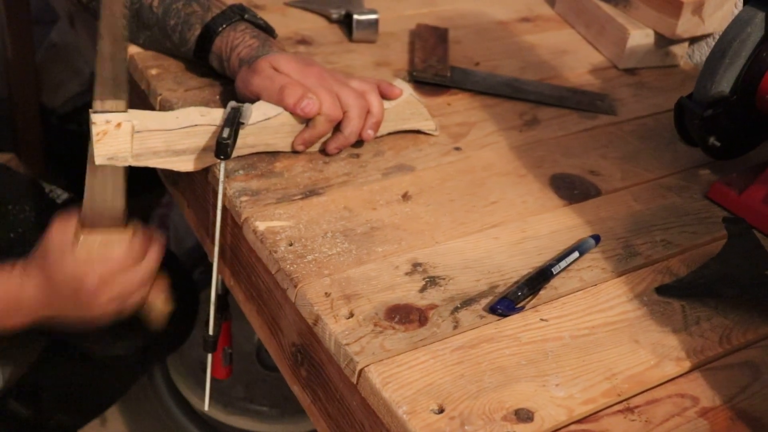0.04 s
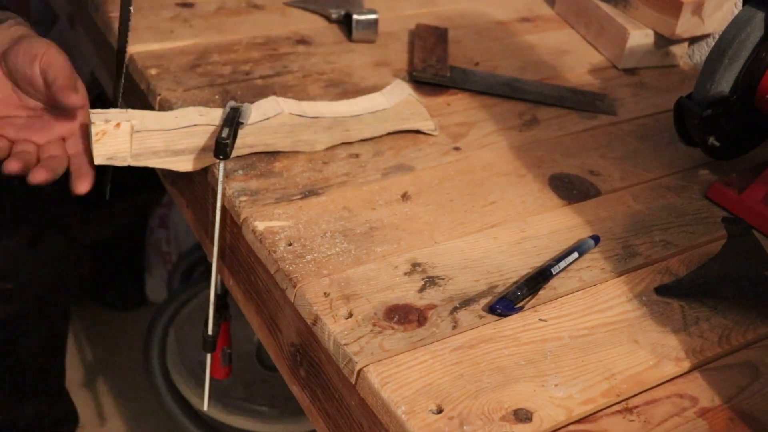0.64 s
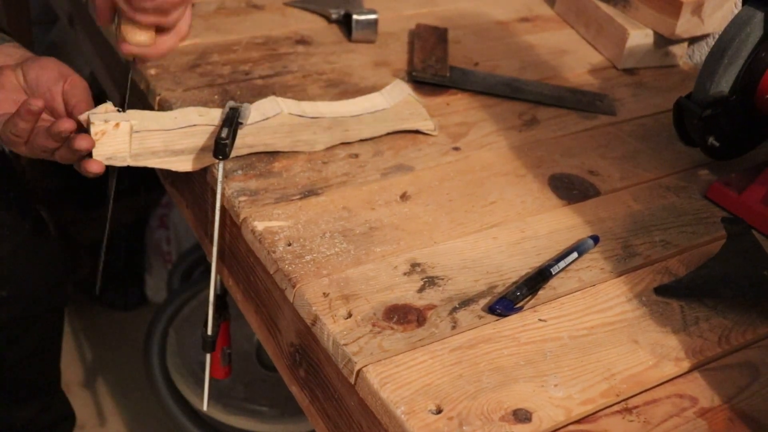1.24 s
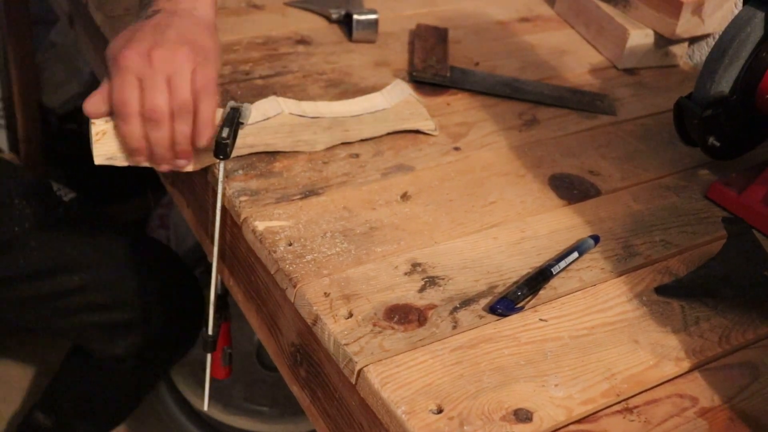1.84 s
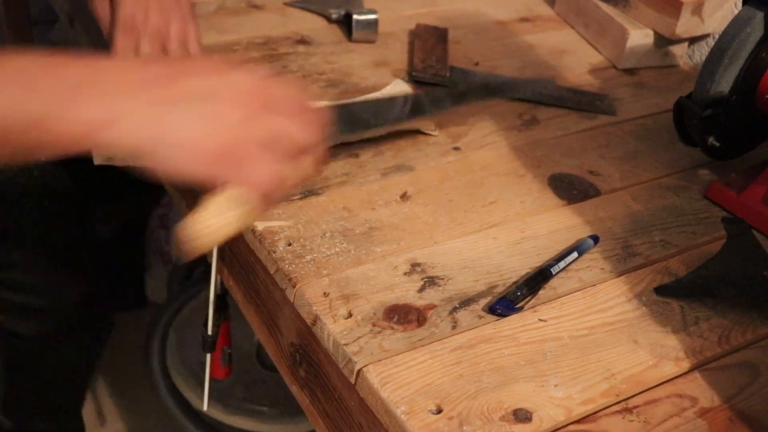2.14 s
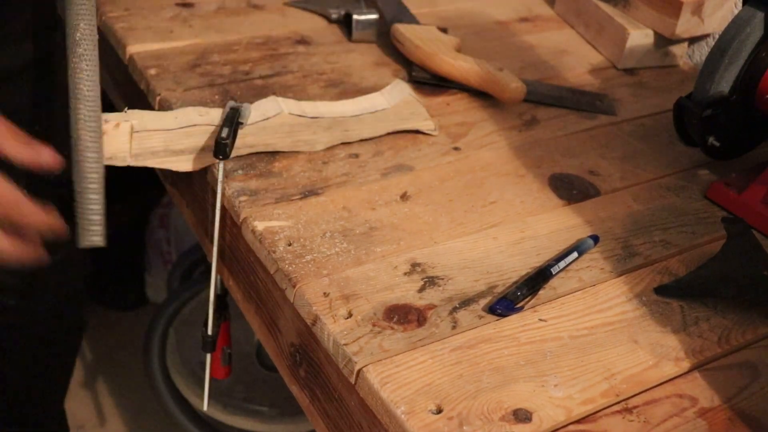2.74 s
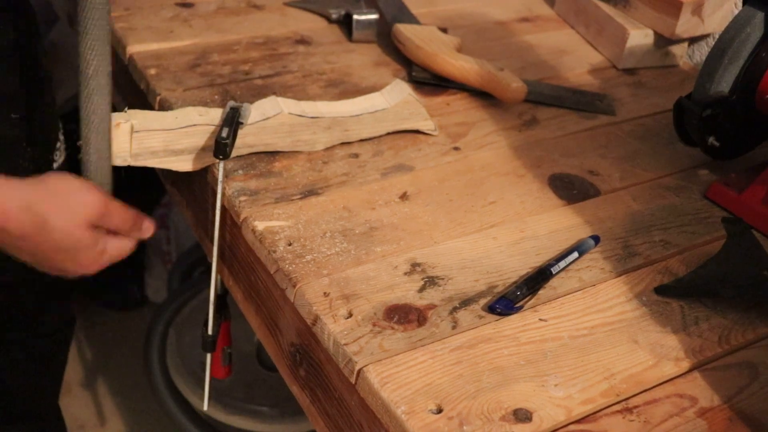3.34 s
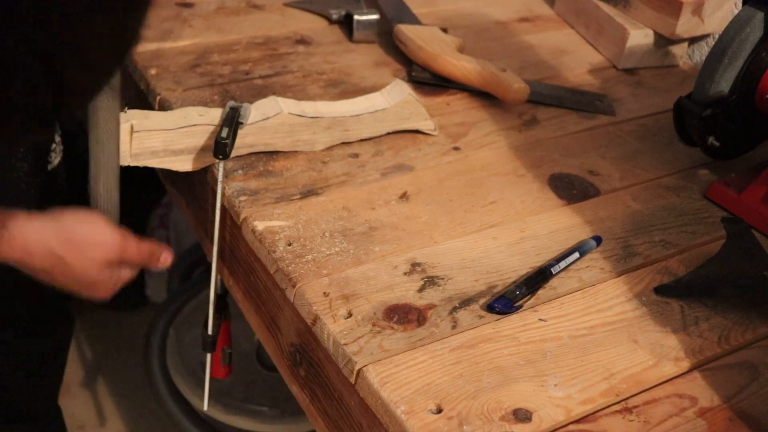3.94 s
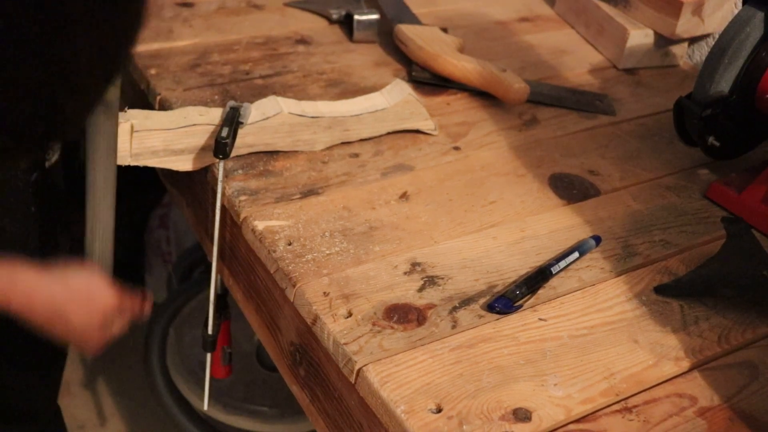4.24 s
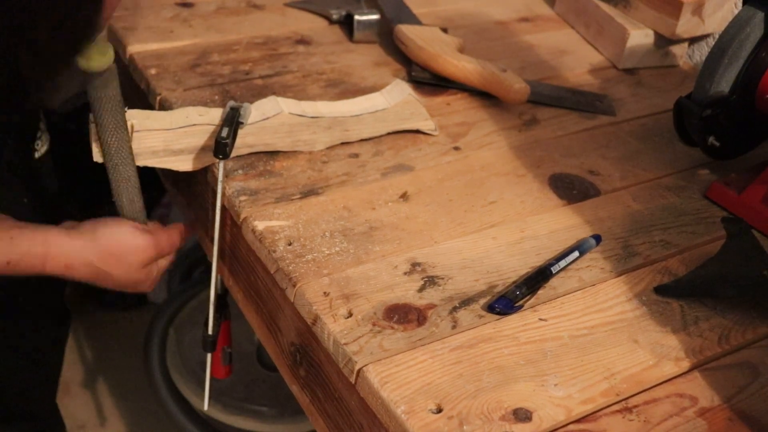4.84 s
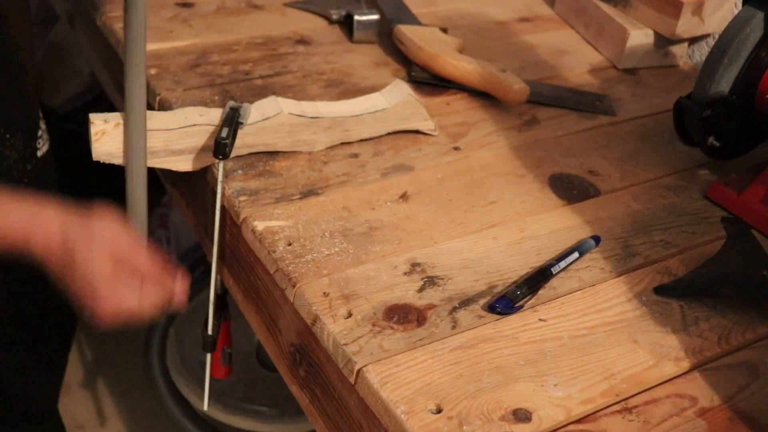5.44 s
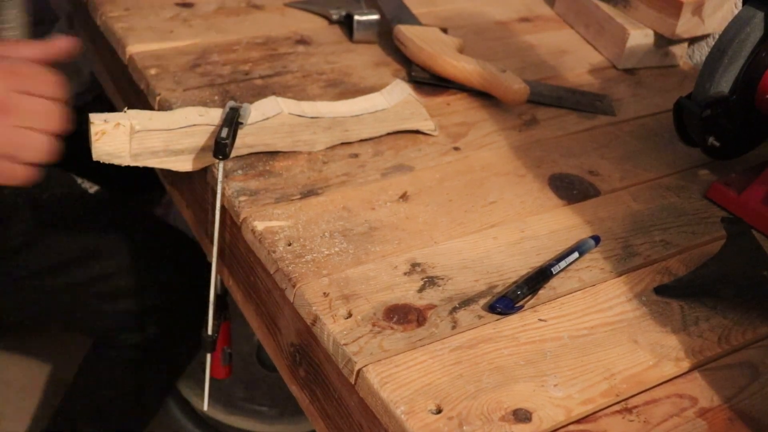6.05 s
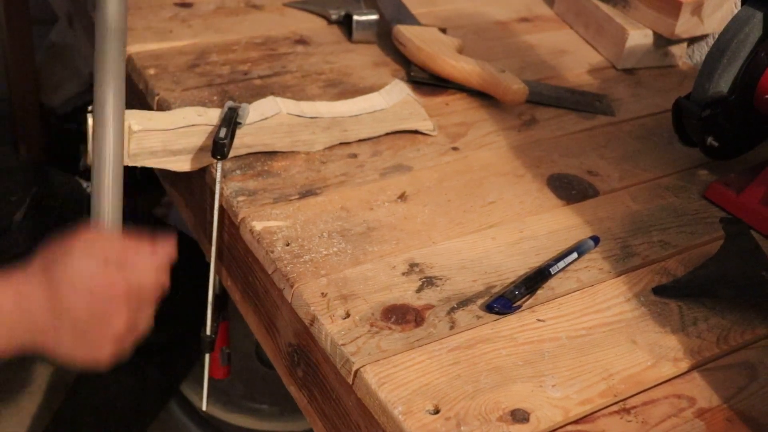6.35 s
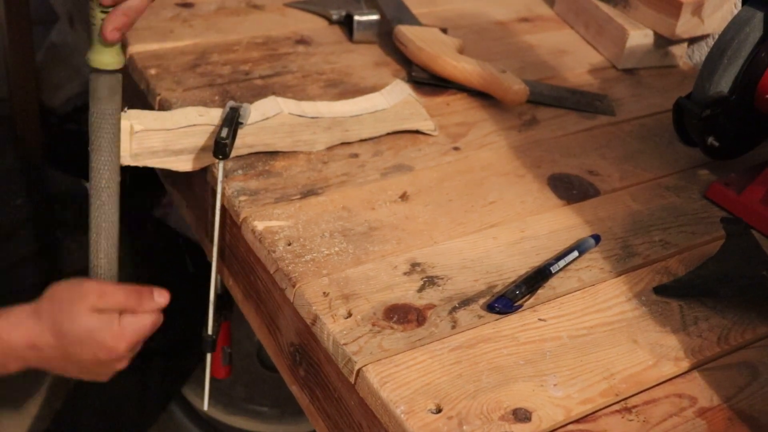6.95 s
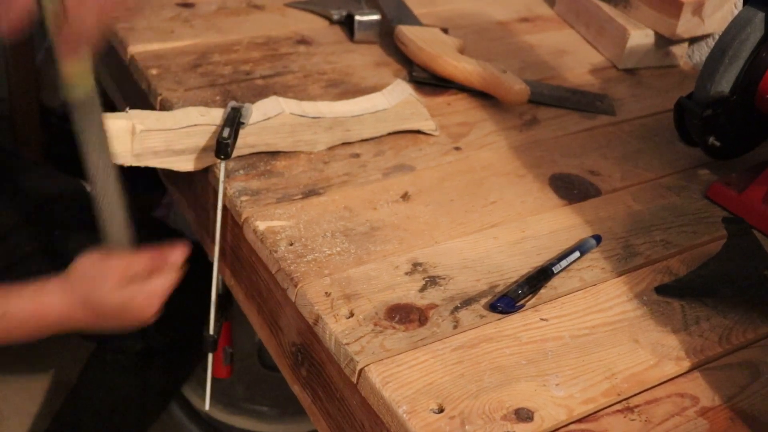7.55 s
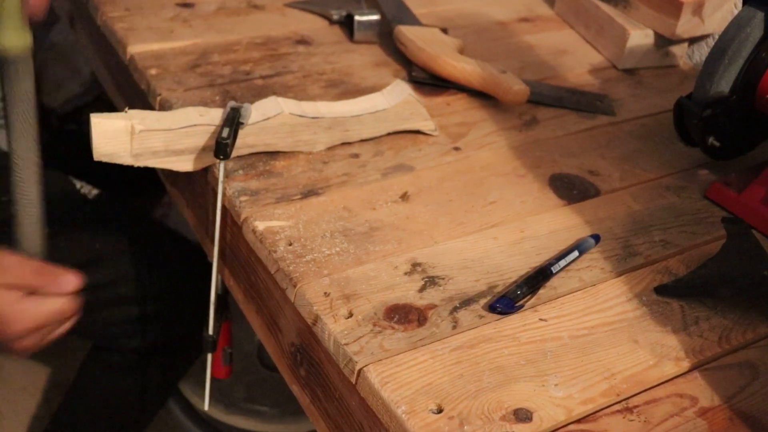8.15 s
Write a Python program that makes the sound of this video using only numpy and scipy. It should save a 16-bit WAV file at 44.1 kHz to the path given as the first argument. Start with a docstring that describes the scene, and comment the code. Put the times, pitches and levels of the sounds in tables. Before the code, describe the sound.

Fast, coarse filing of a wooden handle in a quiet workshop, broken by tool clacks and a short seat scrape.

```python
"""A quick, gritty back-and-forth scraping: a rasp and a file work a wooden handle clamped to a bench.
The teeth tear fibres, giving a coarse hiss, a bright fizz on the cuts and a hollow ring in the handle.
Between bouts the tools knock and slide, a seat scrapes and groans, and hands and sleeves brush about.
Underneath lie the workshop's even noise and a faint, sinking hum."""
import sys
import numpy as np
from scipy import signal
from scipy.fft import rfft, irfft
from scipy.io import wavfile
from scipy.ndimage import uniform_filter1d

SR = 44100
rng = np.random.default_rng(int(sys.argv[2]) if len(sys.argv) > 2 else 0)


def generate_wav(sig):
    """Save sig (samples, or channels by samples) to the path in sys.argv[1] as 16-bit PCM at SR."""
    pcm = np.round(np.clip(np.atleast_2d(sig).T, -1, 1) * 32767).astype(np.int16)
    wavfile.write(sys.argv[1], SR, pcm)


N = 361179
TAPS = 4096
HZ = np.fft.rfftfreq(TAPS, 1 / SR)


def amp(db):
    """Decibels to gain."""
    return 10 ** (np.asarray(db) / 20)


def unit_rms(x):
    """Scales to rms 1."""
    return x / np.sqrt(np.mean(x ** 2) + 1e-20)


def eq_curve(points):
    """Joins EQ points on a log-frequency axis, in dB."""
    hz, db = np.transpose(points)
    return np.interp(np.log(HZ + 1), np.log(hz), db)


def add(mix, s, sound):
    """Mixes a sound in at time s."""
    part = mix[max(round(s * SR), 0):][:len(sound)]
    part += sound[:len(part)]


def ring(x, response):
    """Passes x through an impulse response scaled to unit energy."""
    return signal.oaconvolve(x, response / np.linalg.norm(response))[:len(x)]


def colour(x, db):
    """Minimum-phase EQ; only the curve's shape counts, not its overall level."""
    log_gain = np.log(amp(np.r_[db, db[-2:0:-1]]))
    spectrum = np.exp(np.conj(signal.hilbert(log_gain)))
    return ring(x, np.fft.ifft(spectrum).real)


def arch(length, skew):
    """Swell and fade of one movement; a skew under 1 sharpens the attack."""
    return np.sin(np.pi * np.linspace(0, 1, max(int(length * SR), 2)) ** skew)


def waver(hz):
    """Smooth random modulation of rms 1, up to the given rate."""
    rolloff = 1 + (np.fft.rfftfreq(N, 1 / SR) / hz) ** 4
    return unit_rms(irfft(rfft(rng.standard_normal(N)) / rolloff, N))


def grit(per_s, spread_db):
    """Random snaps of fibres, a few standing out in size."""
    size = amp(spread_db * np.minimum(rng.exponential(1, N), 4))
    return unit_rms(size * rng.choice([-1, 1], N) * (rng.random(N) < per_s / SR))


def drift(x, depth_db=3.5):
    """The point of contact travels, so the colour shifts from moment to moment."""
    spectra = signal.stft(x, nperseg=512)[2]
    patches = uniform_filter1d(rng.standard_normal(spectra.shape), size=4, axis=0)
    patches = unit_rms(uniform_filter1d(patches, size=5, axis=1))
    trim_db = depth_db ** 2 * np.log(10) / 20  # holds the mean power
    return signal.istft(spectra * amp(depth_db * patches - trim_db), nperseg=512)[1][:N]


def reflections(x, t60):
    """A short, dense spray of echoes from bench and walls."""
    t = np.arange(TAPS) / SR
    return ring(x, rng.standard_normal(TAPS) * amp(-60 * t / t60) * (t > .0005))


# tone of the empty workshop: (frequency [Hz], gain [dB])
ROOM_EQ = [(25, -28), (55, -4), (90, -1.5), (180, 0), (290, 5.5), (420, 6), (900, 8.5), (2500, 4),
           (6000, 0.5), (16000, 4.5)]
def room_tone(db=-52):
    """A bed of faint, even noise."""
    return amp(db) * colour(rng.standard_normal(N), eq_curve(ROOM_EQ))


# glide of the hum: (time [s], pitch [Hz], level [dB])
HUM_GLIDE = [(1.2, 317, -77), (2.2, 300, -67.5), (2.6, 281, -71), (3.1, 254.6, -82), (6, 192.2, -77),
             (8.1, 170, -87)]
def hum(wobble=0.013):
    """A faint, unsteady hum sinks slowly in the background."""
    s, hz, db = np.transpose(HUM_GLIDE)
    t = np.arange(N) / SR
    pitch = np.interp(t, s, hz) * (1 + wobble * waver(hz=18))
    return amp(np.interp(t, s, db)) * unit_rms(np.sin(2 * np.pi * np.cumsum(pitch) / SR))


def bench_bump(s=1.543, db=-50, swell_s=0.01, low_hz=98, high_hz=160):
    """A soft, low bump against the bench."""
    t = np.maximum(np.arange(N) / SR - s, 0)
    envelope = amp(db) * t / swell_s * np.exp(1 - t / swell_s)
    return envelope * (np.sin(2 * np.pi * low_hz * t) + .5 * np.sin(2 * np.pi * high_hz * t))


# hand and sleeve moves: (start [s], length [s], soft rub [dB], fine hiss [dB])
BRUSH_CUES = [(0.404, 0.18, -60, -45.5), (0.593, 0.095, -49, -41.5), (1.452, 0.24, -51.5, -44),
              (1.564, 0.042, -40.5, -40.5), (1.58, 0.26, -56.5, -51), (1.763, 0.096, -43, -46.5),
              (1.9, 0.042, -39, -49), (1.979, 0.044, -40.5, -45.5), (1.982, 0.31, -49, -50.5),
              (2.564, 0.58, -55, -51), (5.68, 0.19, -61, -51.5), (5.839, 0.11, -47.5, -47.5),
              (5.974, 0.1, -65, -46.5), (6.13, 0.17, -41, -54)]
# tone of the rub and of the sleeve's hiss: (frequency [Hz], gain [dB])
RUB_EQ = [(100, -44), (350, 1), (450, -4.5), (660, 11), (1100, -3.5), (2800, 5), (4500, -1), (6500, 5.5),
          (10000, -15), (16000, -49)]
SLEEVE_EQ = [(500, -34), (4000, -12), (7000, -1.5), (9200, 3.5), (11000, 2), (13000, 0), (14500, 3.5),
             (16000, -9)]
def brushes(skew=0.57, uneven_db=3.5):
    """Skin and cloth slide unevenly over the dusty wood."""
    rub_power, hiss_power = np.zeros((2, N))
    for s, length, rub_db, hiss_db in BRUSH_CUES:
        add(rub_power, s, (amp(rub_db) * arch(length, skew)) ** 2)
        add(hiss_power, s, (amp(hiss_db) * arch(length, skew)) ** 2)
    pressure = unit_rms(amp(uneven_db * waver(hz=60)))
    rub = np.sqrt(rub_power) * pressure * drift(grit(per_s=15000, spread_db=-3.5))
    hiss = np.sqrt(hiss_power) * drift(grit(per_s=15000, spread_db=5.0))
    return colour(rub, eq_curve(RUB_EQ)) + colour(hiss, eq_curve(SLEEVE_EQ))


# seat and tool slides: (start [s], length [s], level [dB], tone centre [Hz])
SHOVE_CUES = [(0.532, 0.047, -40, 1520), (0.645, 0.043, -26.5, 2130), (0.691, 0.26, -36, 1860),
              (1.646, 0.039, -42.5, 1230), (2.401, 0.039, -26, 3570), (2.45, 0.12, -45, 2600),
              (2.647, 0.052, -26.5, 1830), (2.687, 0.039, -31.5, 2060), (6.065, 0.11, -35.5, 9500)]
# their shared tone: (frequency [Hz], gain [dB])
SHOVE_EQ = [(100, -40), (400, -57), (650, 7), (1000, -3.5), (1300, 4.5), (2000, 2.5), (2500, 4.5),
            (3050, -2.5), (3600, 2.5), (5000, -2), (9000, -2), (16000, -14)]
def shoves(skew=0.52, slope_db=2.5):
    """Short dry scrapes of a seat on the floor and of tools on the bench."""
    out, grains = np.zeros(N), drift(grit(per_s=7000, spread_db=2.0))
    for s, length, db, hz in SHOVE_CUES:
        envelope = np.r_[amp(db) * arch(length, skew) ** 2, np.zeros(TAPS)]
        force = envelope * grains[int(s * SR):][:len(envelope)]
        off_centre_db = slope_db * np.minimum(np.log2((HZ + 1) / hz) ** 2, 6)
        add(out, s, colour(force, eq_curve(SHOVE_EQ) - off_centre_db))
    return out


# groans of the shoved things: (start [s], length [s], first pitch [Hz], last pitch [Hz], level [dB])
GROAN_CUES = [(0.646, 0.057, 473, 477, -39.5), (0.704, 0.164, 470, 447, -38.5),
              (2.644, 0.072, 500, 443, -37.5), (6.07, 0.058, 905, 492, -32)]
def groans(skew=0.62, jitter=0.023):
    """Uneven sticking and slipping gives a rough, mostly sagging tone."""
    out, unsteady = np.zeros(N), waver(hz=300)
    for s, length, first_hz, last_hz, db in GROAN_CUES:
        envelope = amp(db) * arch(length, skew)
        glide = np.linspace(first_hz, last_hz, len(envelope))
        hz = glide * (1 + jitter * unsteady[int(s * SR):][:len(glide)])
        phase = 2 * np.pi * np.cumsum(hz) / SR
        add(out, s, envelope * unit_rms(sum(np.sin(k * phase) / k for k in range(1, 7))))
    return out


def blade(scraping, hz=2555, t60=.25, gain_db=-36):
    """The steel sings on faintly after the teeth leave the wood."""
    t = np.arange(SR // 2) / SR
    return amp(gain_db) * ring(scraping, amp(-60 * t / t60) * np.sin(2 * np.pi * hz * t))


# tool hits on the wood: (time [s], handle ring [dB], scrape [dB], fizz [dB], decay [s])
KNOCK_CUES = [(.21, -44, -28, -27, 0.0099), (1.88, -30, -43, -56, 0.011), (2.3157, -27, -9.5, -11, 0.0017),
              (2.461, -68, -29.5, -26, 0.0093), (2.852, -25.5, -25.5, -47, 0.015),
              (2.902, -30, -32.5, -49, 0.021), (4.761, -21.5, -40, -51, 0.0044),
              (5.093, -21, -23.5, -30.5, 0.011), (5.173, -25, -29, -45, 0.0044),
              (6.302, -25, -24, -33, 0.0077), (6.753, -20.5, -23, -47, 0.0071),
              (7.831, -42, -20, -39, 0.0081)]
def knocks():
    """Sudden, short rattles of the teeth: power envelopes for ring, scrape and fizz."""
    t = np.arange(TAPS) / SR
    powers = np.zeros((3, N))
    for s, *levels, decay in KNOCK_CUES:
        for power, db in zip(powers, levels):
            add(power, s, (amp(db) * np.exp(-t / decay)) ** 2)
    return powers


# the handle's hollow body: (frequency [Hz], width [Hz], relative peak [dB])
HANDLE_MODES = [(368.8, 10.7, -7), (644.2, 88, 5), (675, 54, -30), (729.4, 29, 9), (870, 214, -6),
                (908.5, 49, 6), (1473, 56, -2.5), (1605, 38, -4)]
def handle(force):
    """The clamped handle rings in its few damped modes."""
    power = sum((amp(db) / (1 + (2 * (HZ - hz) / width) ** 2)) ** 2 for hz, width, db in HANDLE_MODES)
    return colour(force, 10 * np.log10(power + 1e-9))


# broad tone of the scrape: (frequency [Hz], gain [dB])
SCRAPE_EQ = [(200, -33.5), (450, -24), (1100, -8.5), (1450, -0.5), (2200, -3.5), (3100, -5.5), (4400, 1),
             (5000, 1), (5800, 2), (6900, -4.5), (7600, -3.5), (9000, -12.5), (12000, -5), (16000, -18)]
# peaks on top of it: (frequency [Hz], width [Hz], boost [dB])
SCRAPE_PEAKS = [(350.4, 44, 26), (2500, 360, 9.5), (2788, 81, 9), (3380, 45, 9), (3722, 85, 9),
                (5480, 86, 10.5), (6230, 460, 5.5), (6624, 89, 11.5)]
def tooth_hiss(force):
    """Resonances of tool, clamp and wood colour the scrape of the teeth."""
    peaks_db = sum(db / (1 + (2 * (HZ - hz) / width) ** 2) for hz, width, db in SCRAPE_PEAKS)
    return colour(force, eq_curve(SCRAPE_EQ) + peaks_db)


# fader ride on the handle's ring, one list a bout: (time [s], level [dB])
RING_RIDE = [
    [(0.03, -29), (0.11, -37)],
    [(0.92, -26), (1.12, -27), (1.19, -26), (1.39, -30.5)],
    [(2.96, -31), (3.12, -31.5), (3.16, -43.5), (3.24, -28.5), (3.5, -28), (3.62, -34), (3.95, -29),
     (4.05, -33.5), (4.27, -35.5), (4.39, -30.0), (4.59, -30)],
    [(4.81, -29.5), (4.97, -32.5)],
    [(5.23, -29), (5.39, -28), (5.64, -32.5)],
    [(6.23, -29.5), (6.5, -35.5), (6.54, -34), (6.7, -28)],
    [(6.91, -32.0), (7.14, -40.0), (7.16, -39), (7.41, -31.5)],
    [(7.48, -32.5), (7.73, -28.5)],
]
def bout(start, count, first_s, last_s, pressure_db, cut_share=0.69, turn_share=0.562, back_share=0.57):
    """Cut and return alternate as the tempo drifts; the cut tears more and drives the handle harder."""
    k = np.arange(round(count))
    back = k % 2
    cycles = np.linspace(first_s, last_s, (len(k) + 1) // 2)
    cycle = cycles[k // 2]
    s = start + np.cumsum(cycles)[k // 2] - cycle + back * turn_share * cycle
    length = cycle * np.where(back, back_share, cut_share)
    length[-1] = 0.081  # the last stroke runs on as the tool lifts off
    press, grip = rng.standard_normal((len(k), 2)).T  # no two strokes are pressed alike
    force_db = pressure_db + 0.66 * press
    scrape_db = force_db + np.where(back, -24.1, -25)
    fizz_db = force_db + np.where(back, -39, -30)
    ring_db = np.interp(s + length / 2, *np.concatenate(RING_RIDE).T)
    ring_db += force_db + np.where(back, 0.9, 4) + 1.73 * grip
    ring_db[0] -= 2.5  # the opening stroke shakes the handle less
    return np.transpose([s, length, scrape_db, ring_db, fizz_db])


# runs of to and fro: (start [s], strokes [count], first cycle [s], last cycle [s], pressure [dB])
BOUT_CUES = [(.012, 3, .062, .062, 0), (.906, 19, .046, .057, -1.7), (2.935, 45, .078, .0695, 0),
             (4.789, 5, .077, .068, -1), (5.2, 13, .0735, .068, -.3), (6.212, 11, .084, .087, -.5),
             (6.894, 14, .0735, .071, .3), (7.461, 6, .117, .1, -.5)]
# single passes and false starts: (start [s], length [s], scrape [dB], handle ring [dB], fizz [dB])
PASS_CUES = [(0.0, 0.013, -23.5, -23, -31), (.198, 0.043, -38.5, -41.5, -36.5),
             (.884, 0.034, -28, -25, -35), (2.311, 0.097, -29, -33.5, -38), (4.757, 0.057, -33, -27, -45),
             (6.187, 0.02, -31, -23.5, -33), (6.684, 0.062, -27, -30, -50), (6.751, 0.052, -25.5, -26, -31),
             (6.781, 0.061, -32.5, -31, -40), (7.825, 0.033, -35, -45, -48),
             (7.854, 0.043, -29.5, -21.5, -38.5), (7.92, 0.094, -26.5, -29, -31),
             (8.064, 0.052, -37.5, -30, -46.5), (8.109, .038, -27.5, -28, -36)]
def all_strokes():
    """Every stroke of the bouts, and the single passes between them."""
    return np.vstack([bout(*row) for row in BOUT_CUES] + [PASS_CUES])


# the teeth snag and the handle honks: (start [s], length [s], handle ring [dB])
SNAG_CUES = [(2.937, 0.037, -23), (3.473, 0.018, -21), (4.906, .05, -21.5), (5.337, 0.046, -26),
             (6.541, .04, -24), (6.895, 0.022, -27.5), (7.546, 0.028, -22), (7.741, 0.091, -23)]
# tone of the tearing fizz and of the jolt as the teeth dig in: (frequency [Hz], gain [dB])
FIZZ_EQ = [(300, -40), (1000, -30), (5000, -12), (8000, 10), (10000, 0), (11000, 3), (11900, 8.5),
           (13200, 1), (16000, 0)]
JOLT_EQ = [(25, -28), (150, -33), (430, -11.5), (560, -2.5), (660, 8.5), (760, 0.5), (900, -9.5),
           (3000, -7.5), (16000, -34)]
def rasp(strokes, ring_skew=0.41, chatter_db=1.0, fizz_trim_db=-0.5, jolt_s=0.023):
    """Teeth bite early in each stroke and hiss loudest where the tool moves fastest."""
    push, scrape, fizz = knocks()  # strokes add their power to these envelopes
    jolt = np.zeros(N)
    for s, length, scrape_db, ring_db, fizz_db in strokes:
        # a cutting stroke, rich in fizz, spends part of its push in one jolt
        bite_share = np.clip(0.55 * amp(fizz_db - scrape_db + 3.0), 0, .7)
        add(scrape, s, (amp(scrape_db) * arch(length, skew=0.6)) ** 2)
        add(fizz, s, (amp(fizz_db) * arch(length, skew=0.39)) ** 2)
        add(push, s, (1 - bite_share) * (amp(ring_db) * arch(length, ring_skew)) ** 2)
        add(jolt, s, bite_share * length / jolt_s * amp(ring_db) ** 2 * arch(jolt_s, skew=0.61) ** 4)
    for s, length, ring_db in SNAG_CUES:
        add(push, s, (amp(ring_db) * arch(length, ring_skew)) ** 2)
    # rows of teeth catch and let go, shaking hiss, tear and body together
    chatter = unit_rms(amp(chatter_db * waver(hz=240)))
    hiss = tooth_hiss(np.sqrt(scrape) * chatter * drift(grit(per_s=16000, spread_db=2.5)))
    tear = colour(np.sqrt(fizz) * chatter * grit(per_s=14000, spread_db=-3.0), eq_curve(FIZZ_EQ))
    body = handle(np.sqrt(push) * chatter * grit(per_s=4000, spread_db=2))
    bite = colour(np.sqrt(jolt) * grit(per_s=3000, spread_db=-1.5), eq_curve(JOLT_EQ))
    return hiss + amp(fizz_trim_db) * tear + body + bite


def friction(strokes):
    """All the rubbing and scraping, with fresh grain on every call."""
    return rasp(strokes) + shoves() + brushes()


# stereo spread: (frequency [Hz], side over mid before scatter_db [dB])
WIDTH_EQ = [(100, -50), (600, -15), (1400, -16.5), (2800, -7), (5500, 1), (16000, 4.5)]
def scene(wet_db=-16, room_t60=0.26, scatter_db=-4.5, wide_echo_db=-24, wide_air_db=-11):
    """Low notes arrive straight and centred; the treble leaves the tool differently in each direction."""
    strokes = all_strokes()
    scraping = friction(strokes)
    dry = scraping + blade(scraping) + groans() + bench_bump()
    mid = dry + amp(wet_db) * reflections(dry, room_t60) + room_tone() + hum()
    width_db = eq_curve(WIDTH_EQ)
    side_gain = amp(scatter_db) * np.sqrt(np.mean(amp(width_db) ** 2))
    # the sides carry another mix of the many touching teeth
    side = side_gain * colour(friction(strokes) + room_tone(), width_db)
    side += amp(wide_echo_db) * reflections(dry, room_t60) + amp(wide_air_db) * room_tone()
    # the treble leans a little to the right
    side -= .2 * signal.sosfilt(signal.butter(1, 4000, "high", fs=SR, output="sos"), mid)
    return np.array([mid + side, mid - side])


def record(dry, ceiling=.6, cutoff_hz=16150):
    """A soft clip rounds the sharpest peaks, then a steep low-pass trims the top."""
    rounded = dry / (1 + (dry / ceiling) ** 4) ** .25
    lowpass = signal.firwin(511, cutoff_hz, window=("kaiser", 9), fs=SR)
    return signal.oaconvolve(rounded, lowpass[None], "same")


dry = scene()
out = record(dry)
generate_wav(out)
```